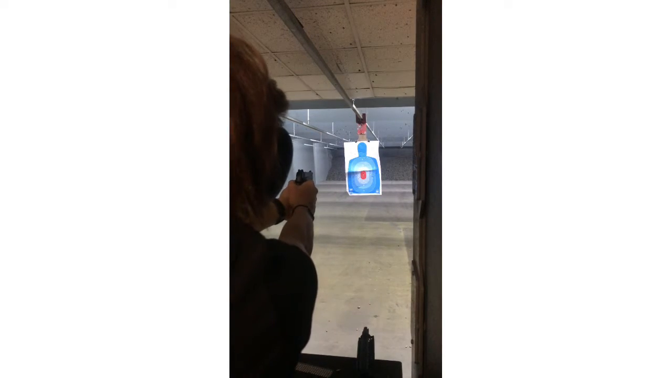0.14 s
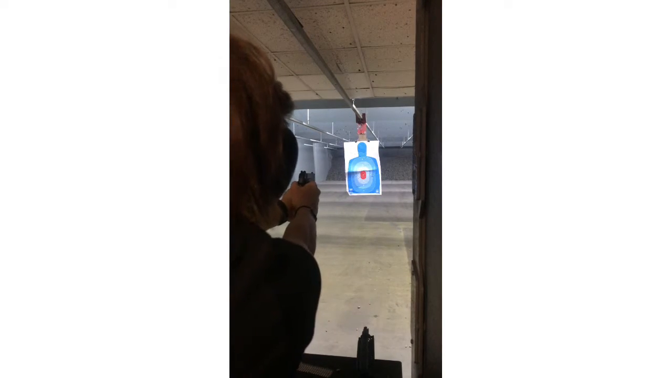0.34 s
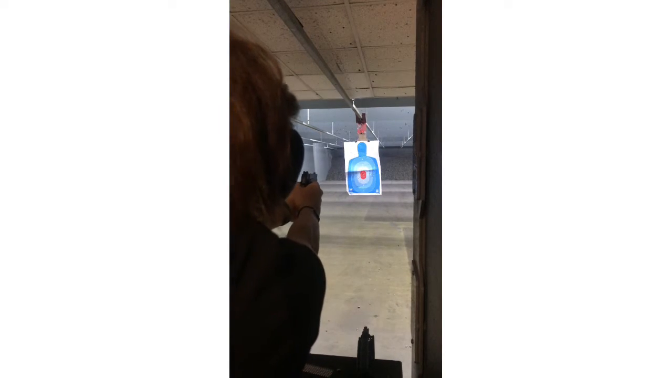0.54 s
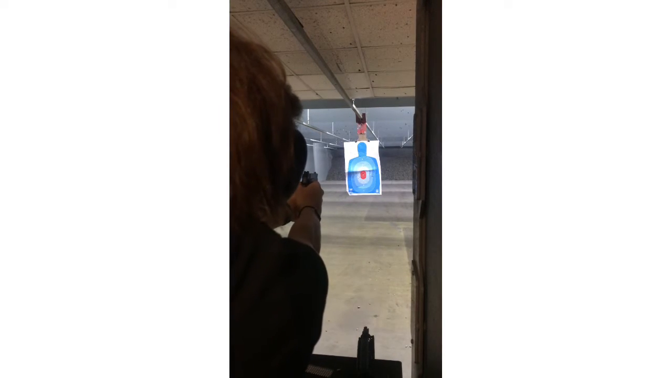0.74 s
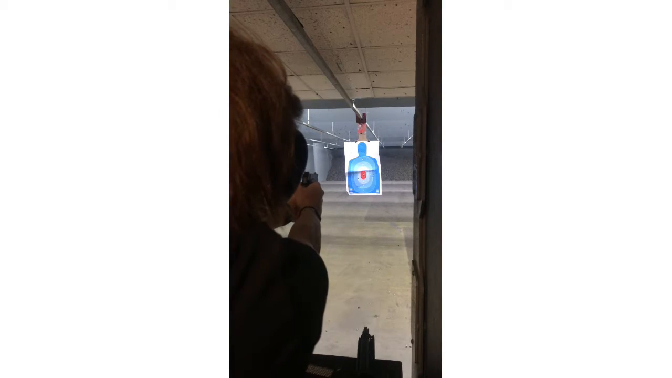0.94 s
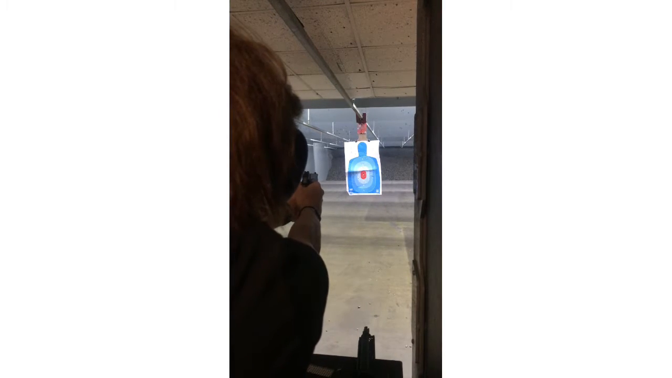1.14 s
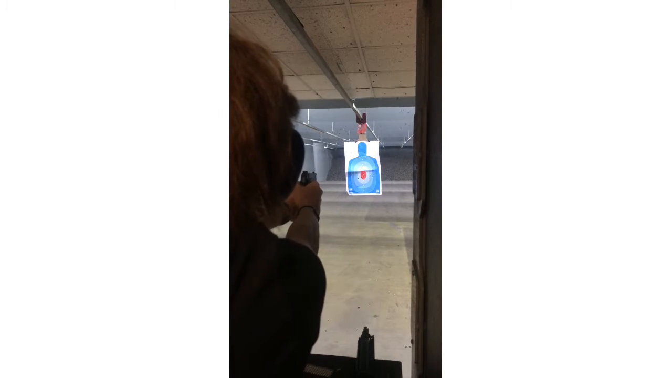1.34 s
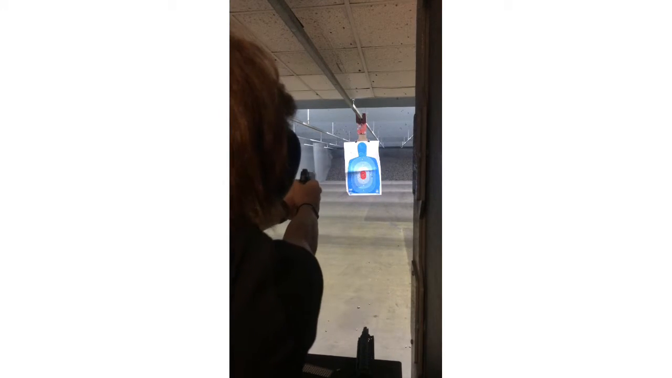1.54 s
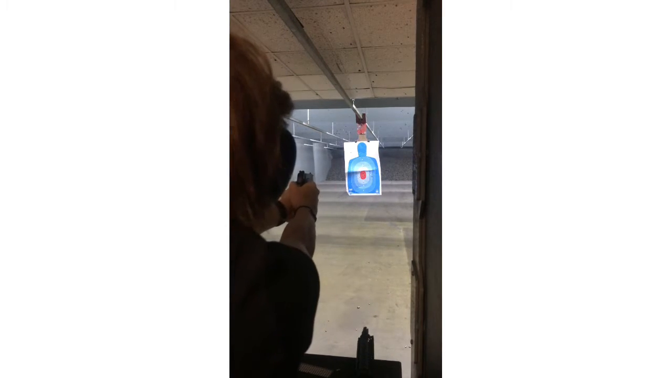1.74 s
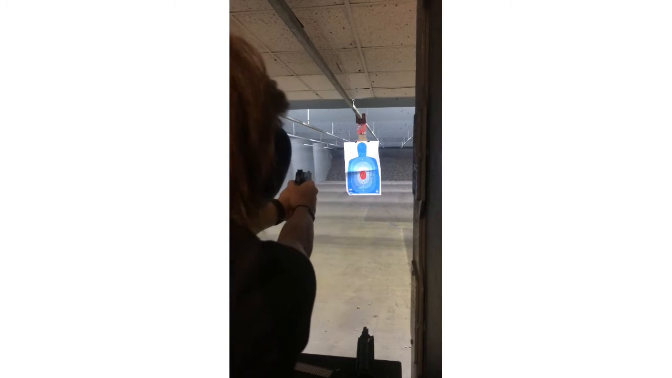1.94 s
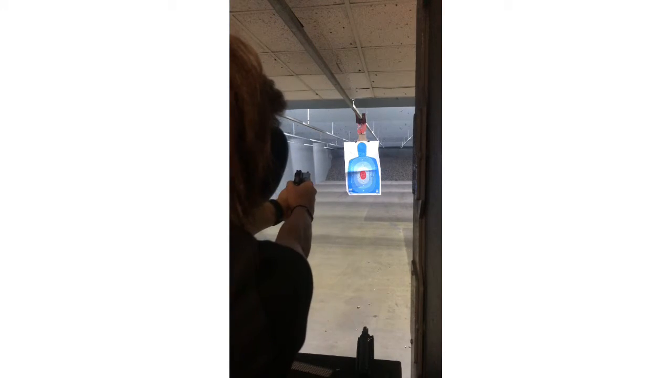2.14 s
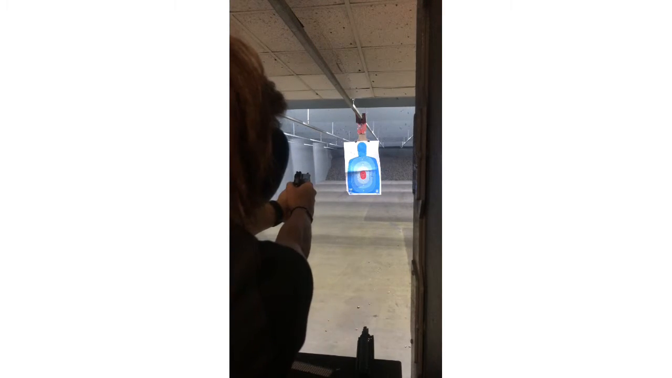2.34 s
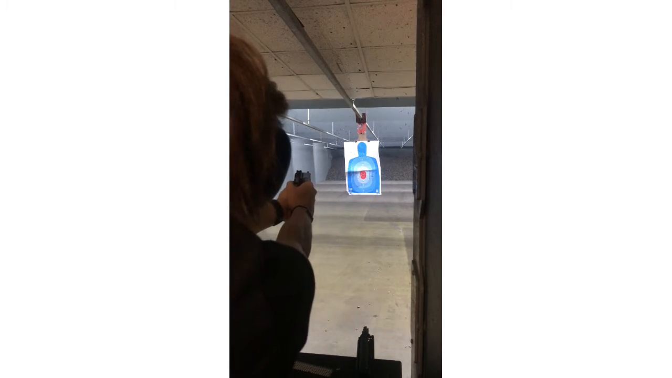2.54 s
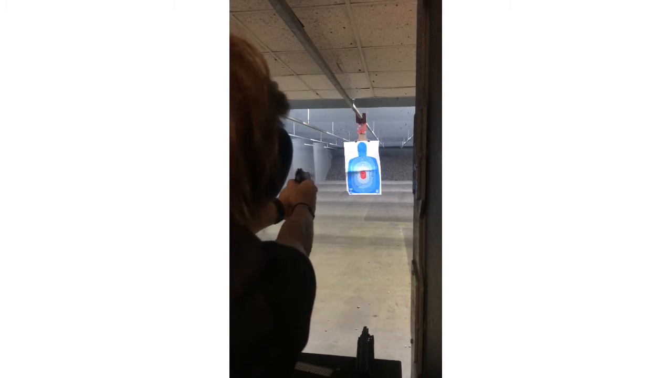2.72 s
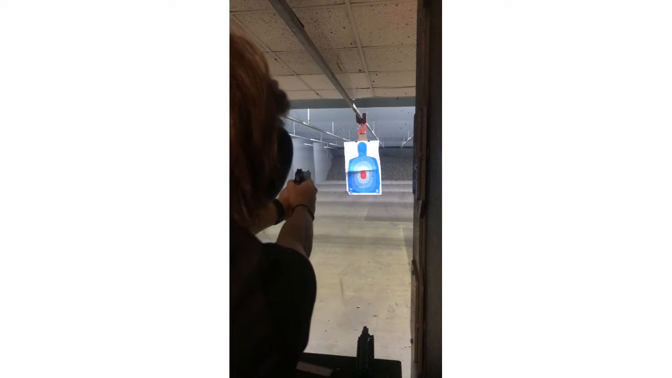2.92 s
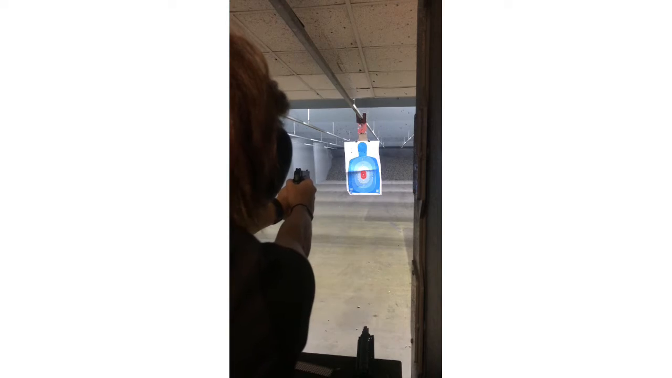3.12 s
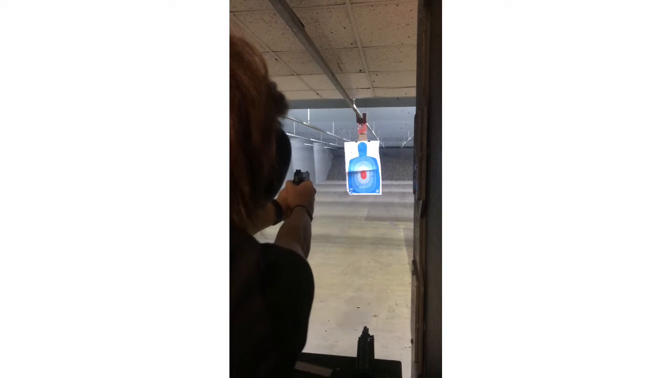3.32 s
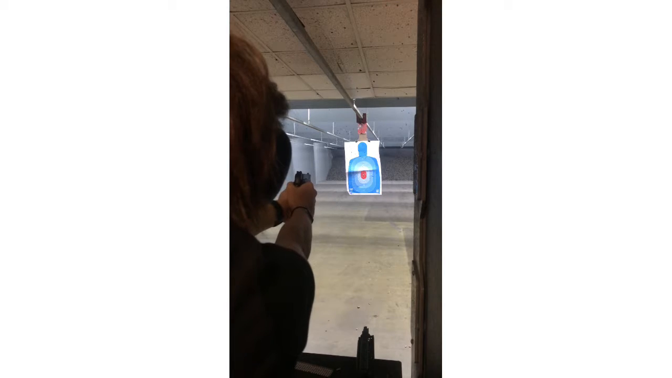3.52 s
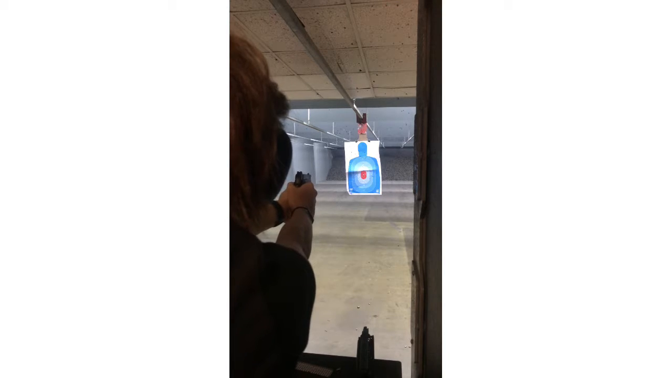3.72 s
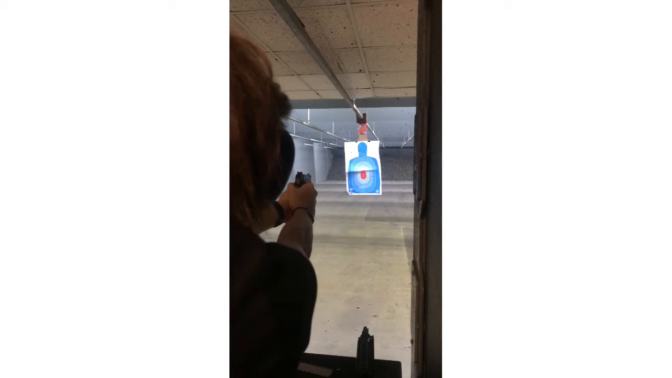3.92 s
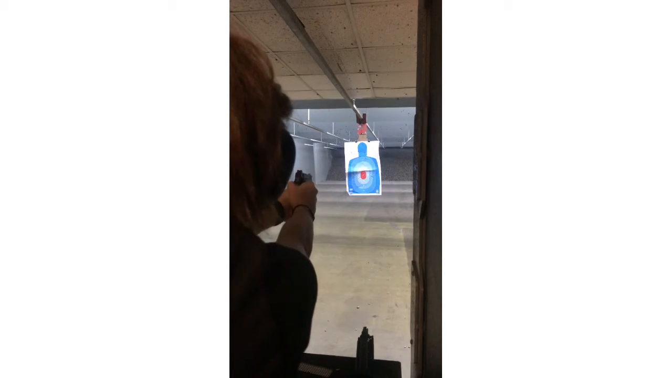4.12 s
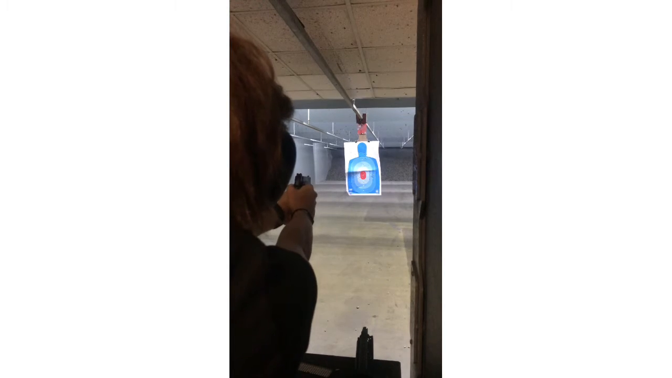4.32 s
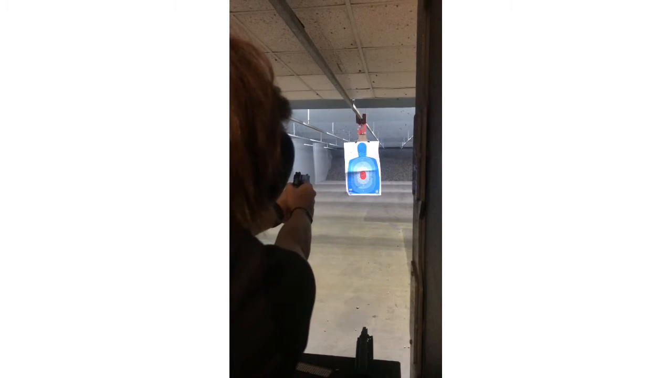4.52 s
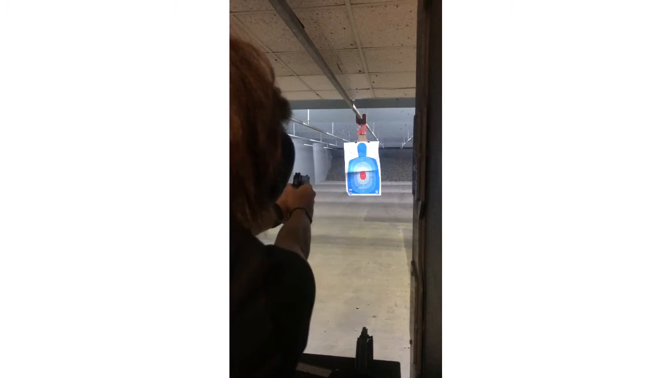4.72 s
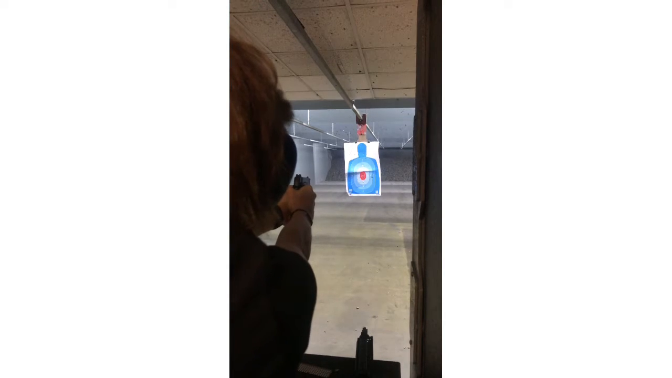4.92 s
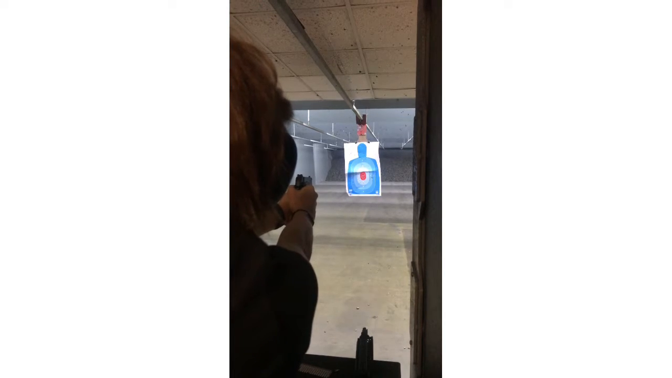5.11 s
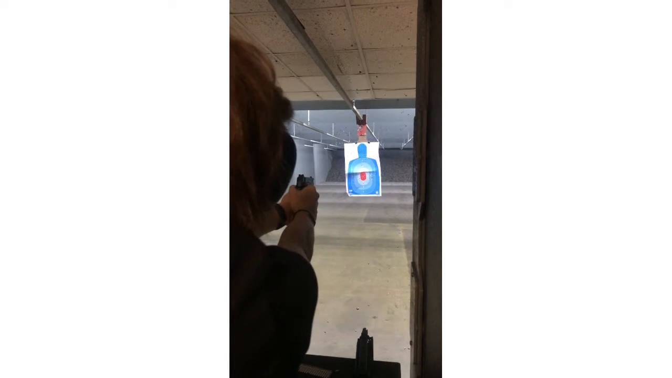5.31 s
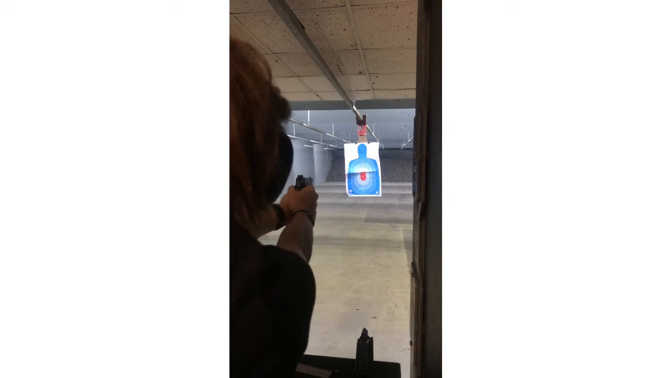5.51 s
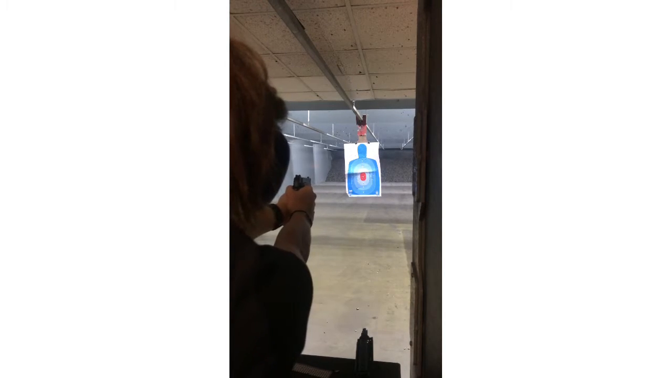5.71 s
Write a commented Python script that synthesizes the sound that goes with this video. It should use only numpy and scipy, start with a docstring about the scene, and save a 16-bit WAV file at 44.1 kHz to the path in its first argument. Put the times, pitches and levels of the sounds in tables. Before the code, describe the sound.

Four unhurried pistol shots bang out close to the microphone in the booth of an indoor range, the last a little weaker. Each is a harsh, slightly distorted crack with a low thump and about a second of reverberation. Thin, high pings of cases bouncing on concrete and a few small clacks fall in the gaps. A low ventilation hum runs underneath, sinking after every shot and rising again.

```python
"""Pistol shots in an indoor range

Over the hum of ventilation and the tail of an earlier shot, a pistol is fired four times in a booth.
Each blast excites the booth's modes, overloads the microphone and reverberates down the lane.
Spent cases ping on the concrete among a few short clacks. Gain control ducks the hum after every shot
and lets it swell again."""
import sys
import numpy as np
from scipy import signal
from scipy.fft import rfft, irfft
from scipy.io import wavfile
from scipy.ndimage import uniform_filter1d

SR = 44100
rng = np.random.default_rng(int(sys.argv[2]) if len(sys.argv) > 2 else 0)


def store_pcm(level_fs):
    """Save levels as 16-bit WAV."""
    pcm = np.round(np.clip(level_fs, -1, 1) * 32767).astype(np.int16)
    wavfile.write(sys.argv[1], SR, np.atleast_2d(pcm).T)


N = 258422


def amp(db):
    """Amplitude ratio of a level in decibels."""
    return 10 ** (np.asarray(db) / 20)


def unit_rms(x):
    """Normalisation to an rms of one."""
    return x / np.sqrt(np.mean(x ** 2) + 1e-20)


def curve_at(points, hz):
    """Linear interpolation on a log-frequency axis."""
    point_hz, value = np.transpose(points)
    return np.interp(np.log(hz + 1), np.log(point_hz + 1), value)


def add(mix, start_s, sound):
    """Superposition: a sound joins the mix at start_s, and what falls outside is cut."""
    start = round(start_s * SR)
    sound = sound[max(-start, 0):]
    part = mix[max(start, 0):][:len(sound)]
    part += sound[:len(part)]


def coloured(white, spectrum):
    """Spectral shaping of white noise, at an rms of one."""
    gain = amp(curve_at(spectrum, np.fft.rfftfreq(len(white), 1 / SR)))
    return unit_rms(irfft(rfft(white) * gain, len(white)))


def absorbed(x, t60_curve, delay_s):
    """Frequency-dependent absorption: after the delay, each band decays at its own rate."""
    hz, t, bands = signal.stft(x, SR, nperseg=512)
    fall = amp(-60 * np.maximum(t - delay_s, 0) / curve_at(t60_curve, hz)[:, None])
    return signal.istft(bands * fall, SR, nperseg=512)[1][:len(x)]


def decay(t, t60_s):
    """Exponential damping, by 60 dB in t60_s."""
    return np.exp(-np.log(1000) * t / t60_s)


def drift(rate_hz):
    """Random fluctuation: low-passed noise at an rms of one."""
    low_pass = np.exp(-(np.fft.rfftfreq(N, 1 / SR) / rate_hz) ** 2)
    return unit_rms(irfft(rfft(rng.standard_normal(N)) * low_pass, N))


# Spectrum of a blast's dull first instant: frequency_hz, relative_density_db
ONSET_SPECTRUM = [(40, -17), (200, 4.5), (400, -14.5), (620, 6.5), (1000, -5.5), (1500, -4.5), (2200, -16),
                  (2700, -4), (3200, -11), (3800, -29.5), (16000, -49)]

def blast_onset(length_s=.0228, swell_db=3, swell_rise_db=44, fizz_db=-27, fizz_rise_db=8):
    """Attack transient: dull noise swells under a thin fizz, each rising to its stated level."""
    t = np.arange(round(length_s * SR)) / SR
    to_go = 1 - t / length_s
    white, fizz = rng.standard_normal((2, 4096))
    swell = amp(swell_db - swell_rise_db * to_go ** 1.47) * coloured(white, ONSET_SPECTRUM)[:len(t)]
    return length_s, swell + amp(fizz_db - fizz_rise_db * to_go) * fizz[:len(t)]


# Spectrum of the blast in the booth: frequency_hz, relative_density_db
BOOTH_SPECTRUM = [(25, -18.5), (60, -14), (90, 6), (135, -9.5), (180, -4.5), (240, 2.5), (650, 1.5),
                  (1000, -0.5), (1700, -5.5), (2300, -9), (3000, -6), (4800, -13.5), (6200, -13),
                  (10000, -21), (16000, -25.5)]
# Reverberation time of the booth: frequency_hz, t60_s
BOOTH_DECAY = [(80, 0.23), (300, 0.29), (800, 0.25), (3000, 0.24), (7000, 0.28), (15000, .23)]
# Normal modes of the booth: pitch_hz, level_db, t60_s
BOOTH_RESONANCES = [(99, -41, 0.82), (292.3, -15.5, 0.31), (349, -20, 0.1), (442, -14.5, 0.2),
                    (504, -26.5, 0.12), (542, -13, 0.16), (573, -10, 0.23), (624, -23.5, 0.4),
                    (746, -16, 0.14), (791, -7.5, 0.18), (826, -5.5, 0.2), (842, -6.5, 0.23),
                    (993, -24.5, 0.15), (1044, -15.5, 0.31), (1133, -17, 0.1005), (1335, -10, 0.067)]

def booth(reflections, phases, t, build_s=0.062, hold_s=0.017, crack_db=-4):
    """Modal excitation: after a bright crack, reflections between the partitions pump up resonances."""
    crack = amp(crack_db) * reflections * decay(t, t60_s=0.03)
    wash = absorbed(coloured(reflections, BOOTH_SPECTRUM), BOOTH_DECAY, hold_s)
    decaying_s = np.maximum(t - hold_s, 0)
    ring = sum(amp(db) * decay(decaying_s, t60_s) * np.sin(2 * np.pi * (hz * t + phase))
               for (hz, db, t60_s), phase in zip(BOOTH_RESONANCES, phases))
    return crack + wash + ring * np.minimum(t / build_s, 1)


def thump(t, delay_s=.0375, width_s=.0022, level_db=1):
    """Bipolar pressure pulse: one slow rarefaction, then compression, follows the crack."""
    widths = (t - delay_s) / width_s
    return amp(level_db) * widths * np.exp(-widths ** 2 / 2)


# Spectrum of the roll from down the lane: frequency_hz, relative_density_db
LANE_SPECTRUM = [(30, -14), (70, 5.5), (110, 21), (160, 5), (300, 7.5), (460, -4), (750, 0.5), (1500, -1),
                 (3800, -2.5), (4900, -8.5), (6300, -8), (10000, -20.5), (15000, -42)]
# Reverberation time of the lane: frequency_hz, t60_s
LANE_DECAY = [(100, 1.15), (500, 1.33), (1500, 1.26), (3500, 1.22), (7000, 0.96), (14000, 0.18)]

def lane(reflections, t, build_s=0.22, decay_from_s=0.31, level_db=-23):
    """Late reverberation: sound returning from the far end builds up and dies away."""
    roll = absorbed(coloured(reflections, LANE_SPECTRUM), LANE_DECAY, decay_from_s)
    return amp(level_db) * roll * np.minimum(t / build_s, 1)


# Shots, the first heard only as a tail: start_s, relative_level_db, case_pitch_hz
FIRINGS = [(-.41, 5.5, 12300), (1.4885, 4, 12300), (2.6659, 3.5, 11800), (4.0453, 3, 11760),
           (5.8264, -7.5, 11760)]

def pistol(blast_db=13.0, fresh_share=0.23, grain_db=1.0):
    """Multipath propagation: the shooter stands still, so all shots share most of their echo paths."""
    out, t = np.zeros(N), np.arange(2 * SR) / SR
    shared = rng.standard_normal((2, len(t)))
    phases = rng.random(len(BOOTH_RESONANCES))
    grain = unit_rms(amp(grain_db * drift(500)[:len(t)]))  # rough crackle in the overloaded blast
    for start_s, level_db, _ in FIRINGS:
        fresh = rng.standard_normal((2, len(t)))
        near, far = np.sqrt(1 - fresh_share) * shared + np.sqrt(fresh_share) * fresh
        lead_s, onset = blast_onset()
        add(out, start_s - lead_s, onset)
        add(out, start_s, amp(blast_db + level_db) * (booth(near * grain, phases, t) + thump(t)))
        add(out, start_s, amp(level_db) * lane(far, t))
    return out


# Spectrum of the air in the ducts: frequency_hz, relative_density_db
DUCT_SPECTRUM = [(25, -35), (62, -3), (80, 1.5), (110, -7.5), (170, -9.5), (245, -9), (340, -20.5),
                 (490, -32.5), (1000, -33), (1700, -40), (3800, -46.5), (5000, -53), (9000, -59.5),
                 (15000, -75)]
# Tones of the fans: pitch_hz, rms_level_db
FAN_PARTIALS = [(75.4, -25.5), (624.5, -56), (995.9, -64.5), (1319, -67)]

def ventilation(air_db=-28.0, waver_db=1, wander_cycles=0.14):
    """Broadband and tonal noise: ducts rumble while fan tones waver in amplitude and phase."""
    t, tones = np.arange(N) / SR, np.zeros(N)
    for pitch_hz, level_db in FAN_PARTIALS:
        amplitude = np.sqrt(2) * amp(level_db + waver_db * drift(8))
        cycles = pitch_hz * t + wander_cycles * drift(4)
        tones += amplitude * np.sin(2 * np.pi * cycles)
    return amp(air_db) * coloured(rng.standard_normal(N), DUCT_SPECTRUM) + tones


# Spectrum of a case striking concrete: frequency_hz, relative_density_db
TICK_SPECTRUM = [(1000, -25), (4000, -1), (6500, 1), (10000, -10), (15000, -7)]
# Bounces of the latest shot's case: start_s, ring_db, tick_db
CASE_BOUNCES = [(.3916, -53, -49), (.873, -54, -53), (.982, -46, -57), (1.2546, -55, -47.5),
                (1.3785, -50, -54), (1.8149, -31, -50), (3.097, -55, -38), (4.6743, -36, -31.5),
                (5.1445, -50, -49)]

def spent_cases(shimmer_db=-58, shimmer_width_hz=170):
    """Free vibration: a case ticks on concrete and its mouth rings, at one pitch for all its bounces."""
    out, t = np.zeros(N), np.arange(SR // 4) / SR
    for start_s, ring_db, tick_db in CASE_BOUNCES:
        pitch_hz = [case_hz for fired_s, _, case_hz in FIRINGS if fired_s < start_s][-1]
        phase = 2 * np.pi * pitch_hz * t
        ring = amp(ring_db) * np.sin(phase) * decay(t, t60_s=0.087)
        # The walls smear every ring into a shimmer of about one level, so loud, near ones sound drier.
        smear = drift(shimmer_width_hz)[:len(t)]
        shimmer = amp(shimmer_db) * np.cos(phase) * smear * decay(t, t60_s=.3)
        contact = coloured(rng.standard_normal(len(t)), TICK_SPECTRUM)
        tick = amp(tick_db) * contact * decay(t, t60_s=0.058)
        add(out, start_s, ring + shimmer + tick)
    return out


# Short knocks and clacks, one a spent case landing: start_s, level_db, centre_hz, breadth_octaves
KNOCKS = [(2.3, -26, 1390, 2.44), (3.1905, -27, 3200, 1.6), (5.0542, -35, 3100, 1.26),
          (5.1432, -37, 3800, 1.5), (5.1891, -39.5, 1000, 1.1)]

def clacks(t60_at_1khz_s=0.071, skirt_db=-14):
    """Damped resonance: each knock is one broad band of noise that dies the sooner the higher it lies."""
    out, t = np.zeros(N), np.arange(SR // 4) / SR
    bands_hz = np.geomspace(20, SR / 2, 40)
    for start_s, level_db, centre_hz, breadth_octaves in KNOCKS:
        breadths_away = np.log2(bands_hz / centre_hz) / breadth_octaves
        spectrum = np.transpose([bands_hz, skirt_db * breadths_away ** 2])
        knock = coloured(rng.standard_normal(len(t)), spectrum)
        t60_s = t60_at_1khz_s * np.sqrt(1000 / centre_hz)
        add(out, start_s, amp(level_db) * knock * decay(t, t60_s))
    return out


def scene():
    """Superposition of all sources at the microphone, in one channel."""
    return (pistol() + ventilation() + spent_cases() + clacks())[None]


def peak_follower(level_db, release_db_per_s):
    """Peak detection: follows rises at once and falls back at a steady rate."""
    fall_db = np.arange(N) * release_db_per_s / SR
    return np.maximum.accumulate(level_db + fall_db) - fall_db


def power_db(x, samples):
    """Moving mean-square level in decibels."""
    return 10 * np.log10(abs(uniform_filter1d(x ** 2, samples)) + 1e-12)


def gain_control(x, threshold_db=-11, depth_db=12, recovery_db_per_s=27, initial_excess_db=20):
    """Compression: loud sound lowers the gain by a limited depth, and it recovers slowly."""
    excess_db = power_db(x, samples=300) - threshold_db
    excess_db[0] = initial_excess_db  # the gain starts out turned down
    cut_db = np.clip(peak_follower(excess_db, recovery_db_per_s), 0, depth_db)
    return x / amp(uniform_filter1d(cut_db, size=100))


def limiter(x, limit_db=-6.5, release_db_per_s=350, ceiling=.95):
    """Limiting and saturation: blasts are held at one level, and peaks that slip through clip softly."""
    excess_db = power_db(x, samples=260) - limit_db
    cut_db = np.maximum(peak_follower(excess_db, release_db_per_s), 0)
    limited = x / amp(uniform_filter1d(cut_db, size=80))
    return limited / (1 + (limited / ceiling) ** 4) ** .25


def record(dry, cutoff_hz=15900):
    """Dynamic range and bandwidth reduction: gain control, limiter, then a low-pass filter."""
    limited = limiter(gain_control(dry[0]))
    low_pass = signal.firwin(511, cutoff_hz, window=("kaiser", 8), fs=SR)
    return signal.oaconvolve(limited, low_pass, "same")[None]


dry = scene()
out = record(dry)
store_pcm(out)
```